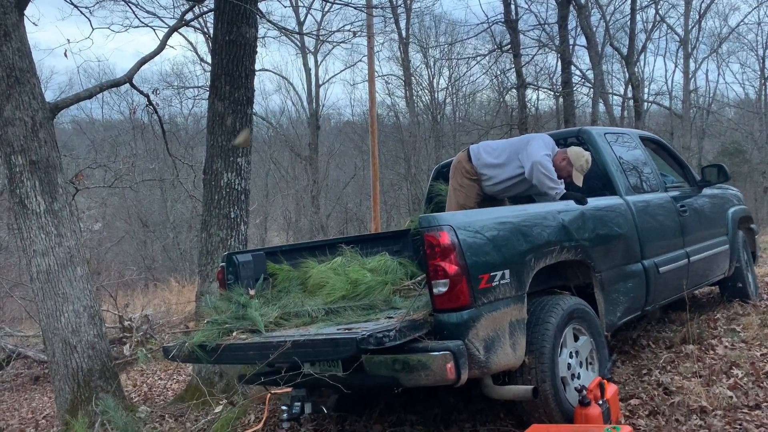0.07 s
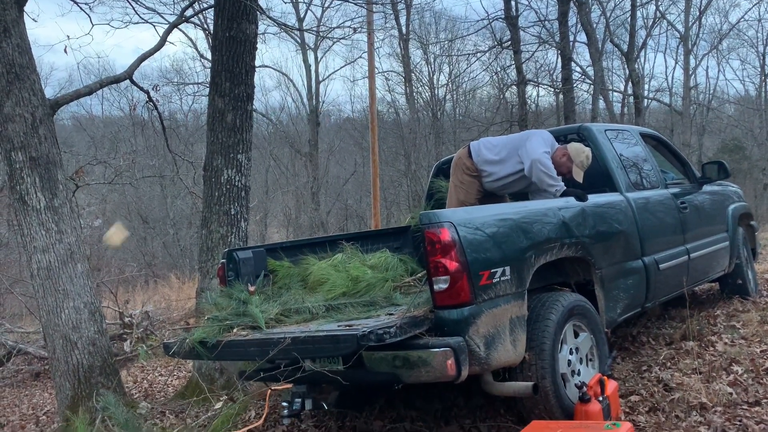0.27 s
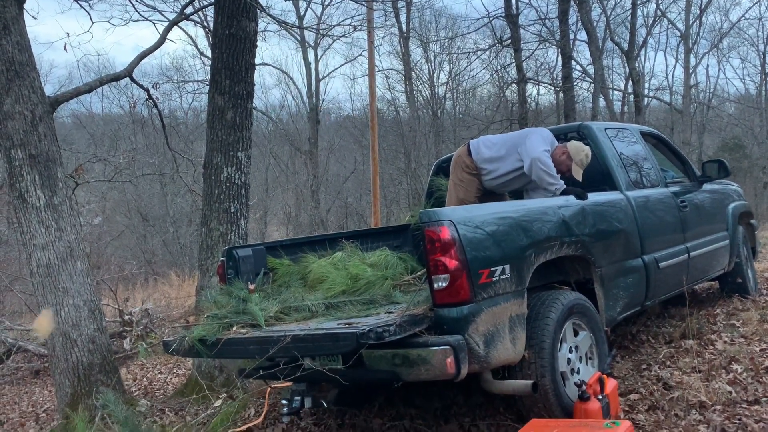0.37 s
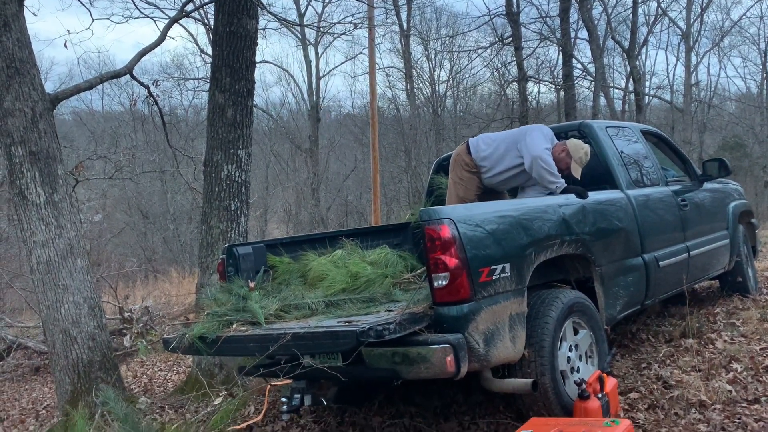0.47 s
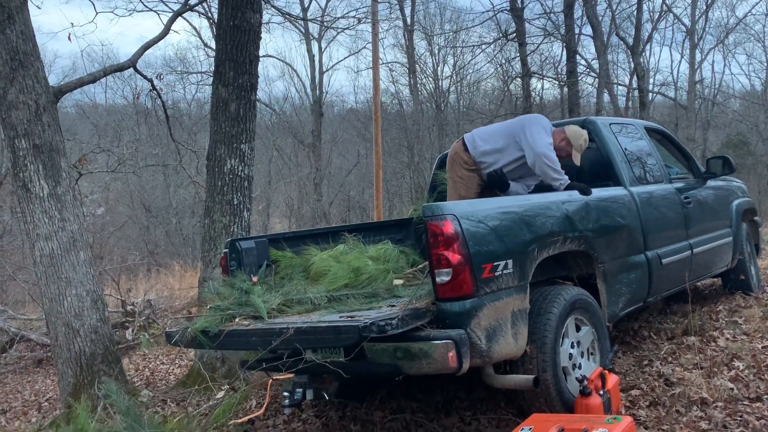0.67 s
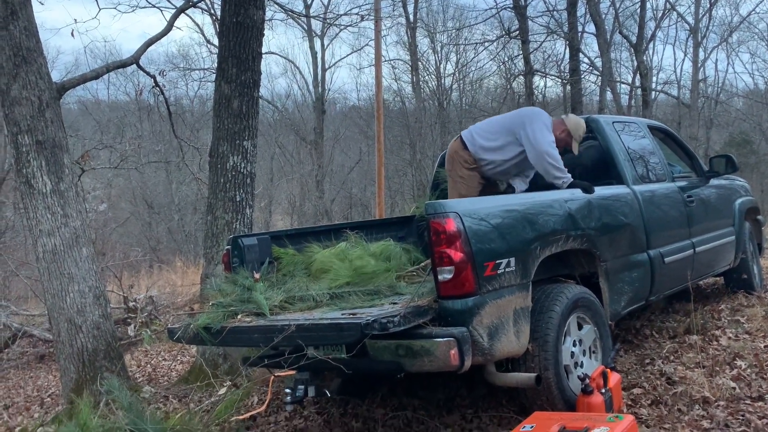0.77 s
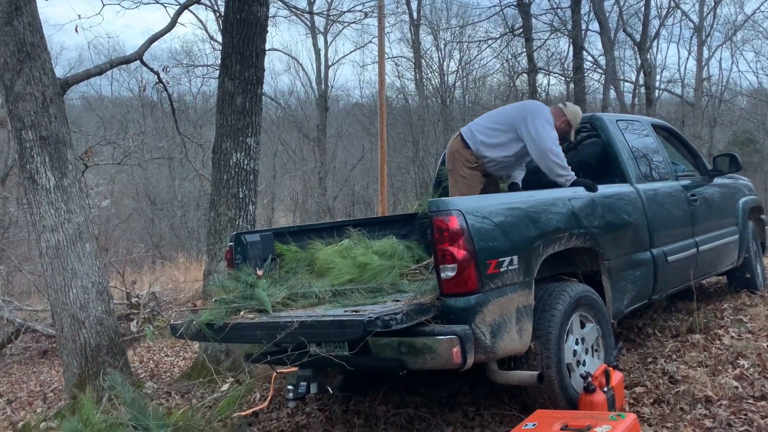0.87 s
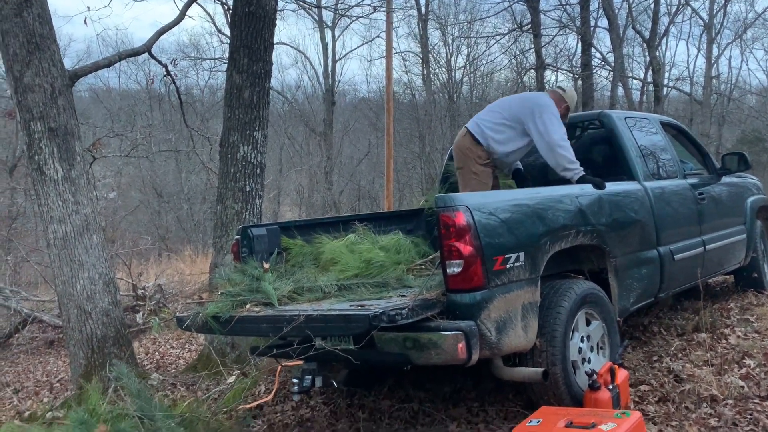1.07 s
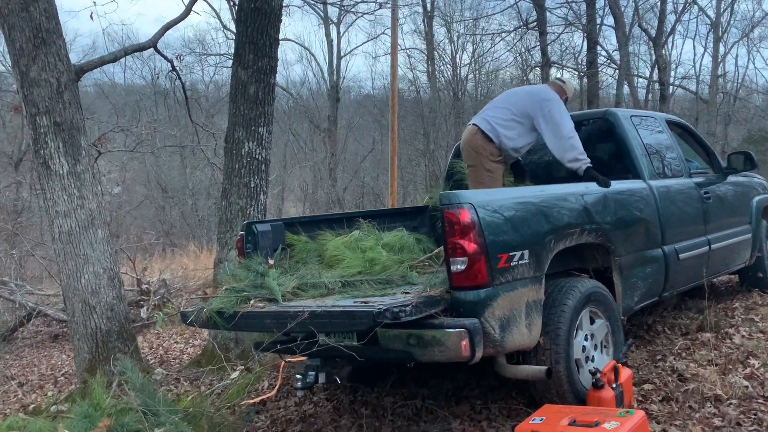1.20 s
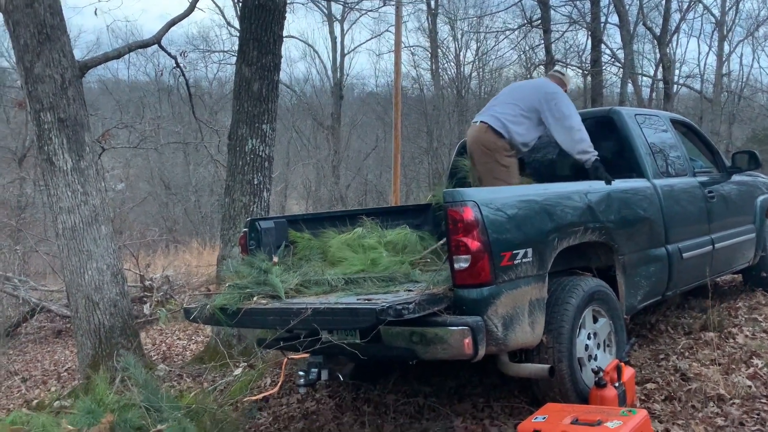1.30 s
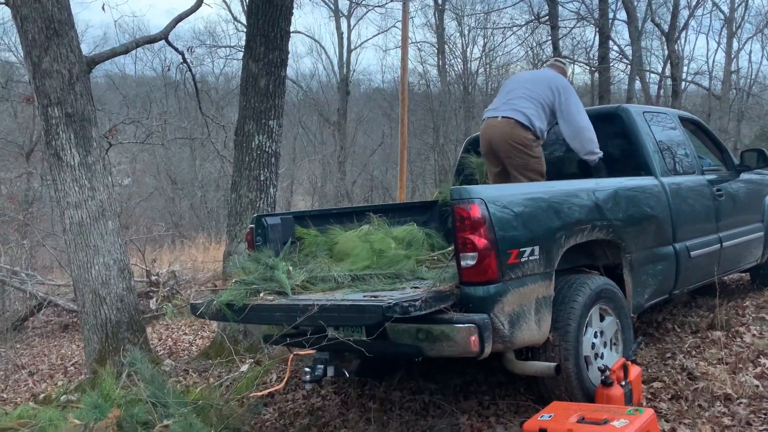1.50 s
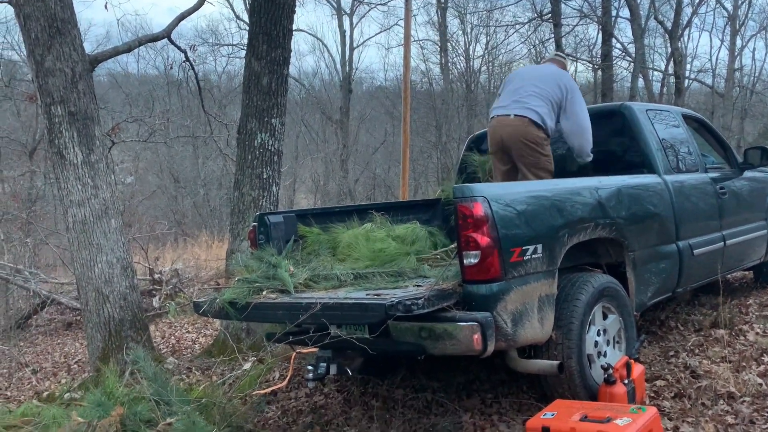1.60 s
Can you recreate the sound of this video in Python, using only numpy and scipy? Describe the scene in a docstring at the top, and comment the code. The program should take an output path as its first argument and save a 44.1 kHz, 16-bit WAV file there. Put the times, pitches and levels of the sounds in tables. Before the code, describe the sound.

Knocks and scraping come from someone shifting a load in a pickup bed a few metres away. From about 0.2 seconds it drags in jerks, with booming knocks loudest near 0.4, 0.5 and 0.8 seconds. Twigs tick and pine boughs swish around 0.7, then clothing rustles and squeaks faintly. Soft, low thumps follow from 1.0 to 1.3, and a light knock near 1.6, over faint woodland air.

```python
"""Shifting about in a pickup bed

Quiet woods, a close pair of microphones a few metres from the truck. Someone moves in the bed: a load
sticks and slips over the ribbed floor, soles scuff on grit, boots and load knock and the panels boom.
Pine boughs and clothing swish, cloth squeaks and twigs tick. Underneath, over faint air, the truck's
body rumbles on its springs and thumps softly."""
import sys
import numpy as np
from scipy import signal
from scipy.fft import rfft, irfft, next_fast_len
from scipy.io import wavfile
from scipy.ndimage import map_coordinates

SR = 44100
rng = np.random.default_rng(int(sys.argv[2]) if len(sys.argv) > 2 else 0)


def transcribe(u):
    """Save the signal u as a 16-bit wav file named by the first command-line argument.

    u: samples, shape (n,) or (channels, n), limited to [-1, 1]; the rate is SR.
    q: integer samples, one column per channel.
    """
    v = np.clip(np.atleast_2d(u).T, -1, 1)
    q = np.round(v * 32767).astype(np.int16)
    wavfile.write(sys.argv[1], SR, q)


N = 72765


def amp(db):
    """Decibels to gain."""
    return 10 ** (np.asarray(db) / 20)


def unit(x):
    """Scale to rms 1."""
    return x / np.sqrt(np.mean(x ** 2) + 1e-20)


def along(points, hz):
    """Read (f/Hz, value) points on a log frequency axis."""
    f, values = np.transpose(points)
    return np.interp(np.log(hz + 1), np.log(f + 1), values)


def level(points):
    """Gain per sample from (t/s, level/dB) points."""
    return amp(np.interp(np.arange(N) / SR, *np.transpose(points)))


def since(s):
    """Seconds since s, zero before."""
    return np.maximum(np.arange(N) / SR - s, 0)


def filtered(x, response):
    """Pass x through a complex frequency response."""
    size = next_fast_len(N + SR // 4)
    return irfft(rfft(x, size) * response(np.fft.rfftfreq(size, 1 / SR)), size)[..., :N]


def noise():
    """Two white noises."""
    return rng.standard_normal((2, N))


def grains(per_s=7000, scatter_db=0.5):
    """Friction as tiny impulses at random moments, of scattered size."""
    return noise() * (rng.random(N) < per_s / SR) * amp(scatter_db * rng.standard_normal(N))


def wobble(per_s):
    """A smooth random curve through per_s knots a second."""
    return map_coordinates(rng.standard_normal(N // 8), [np.arange(N) * per_s / SR], order=2)


def resonances(bands, hz):
    """Summed response of (f/Hz, width/Hz, level/dB) resonances."""
    return sum(amp(db) * 1j * hz * width / (centre ** 2 - hz ** 2 + 1j * hz * width)
               for centre, width, db in bands)


def ring(modes, t, scatter_db):
    """Damped (f/Hz, level/dB, t60/s) modes, their levels scattered at each strike."""
    return sum(amp(db + scatter_db * rng.standard_normal() - 60 * t / t60) * np.sin(2 * np.pi * hz * t)
               for hz, db, t60 in modes)


# Likeness at the two microphones, for sounds in the bed and for wide ones: f/Hz, coherence
BED_COHERENCE = [(200, 0.96), (1000, 0.84), (2000, 0.7), (3000, 0.17), (4200, 0.35), (6500, 0.32)]
WIDE_COHERENCE = [(40, 0.72), (300, 0.91), (1000, 0.087), (2000, 0.39), (4200, 0.38), (6500, 0.47)]
MONO_ABOVE_HZ = 7400

def stereo(pair, spectrum, coherence):
    """Two unrelated signals as a coloured, partly alike left and right of rms 1."""
    def mid_and_side(hz):
        spread = np.arccos(np.clip(along(coherence, hz), -1, 1)) / 2 * (hz < MONO_ABOVE_HZ)
        return amp(along(spectrum, hz)) * [np.cos(spread), np.sin(spread)]
    mid, side = filtered(pair, mid_and_side)
    return unit(np.array([mid + side, mid - side]))


# Colour of the quiet woods: f/Hz, level/dB
AIR_SPECTRUM = [(40, -4.5), (120, -0.5), (320, -2), (600, -16.5), (1000, -20.5), (1700, -29), (3300, -27),
                (6500, -31), (10000, -34.5), (15000, -39)]

def woodland_air():
    """Faint, steady air all around the microphones."""
    return amp(-59) * stereo(noise(), AIR_SPECTRUM, WIDE_COHERENCE)


# The body rocking on its springs: t/s, level/dB
ROCKING = [(0, -65), (.25, -52), (.5, -51), (.75, -53), (.95, -51.5), (1.06, -52.5), (1.13, -49.5),
           (1.28, -51), (1.39, -49), (1.5, -65.5), (1.65, -46)]
# Colour of its rumble: f/Hz, level/dB
RUMBLE_SPECTRUM = [(20, -40), (40, -16), (60, -0.5), (90, -3), (140, -10), (250, -30.5), (600, -83)]
# Soft thumps of the body: t/s, level/dB, starting f/Hz
BODY_THUMPS = [(1.045, -36, 81), (1.147, -27.5, 227), (1.266, -35, 73.5), (1.576, -42.5, 285)]
THUMP_END_HZ, THUMP_SAG_S, THUMP_RISE_S, THUMP_T60_S = 57.7, 0.0125, 0.0036, 0.14

def truck_body():
    """The truck rumbles as the weight shifts and gives soft thumps that sag in pitch."""
    out = level(ROCKING) * stereo(noise(), RUMBLE_SPECTRUM, WIDE_COHERENCE)
    for s, db, start_hz in BODY_THUMPS:
        t = since(s)
        hz = THUMP_END_HZ + (start_hz - THUMP_END_HZ) * np.exp(-t / THUMP_SAG_S)
        envelope = amp(db - 60 * t / THUMP_T60_S) * (1 - np.exp(-t / THUMP_RISE_S))
        out -= envelope * np.sin(2 * np.pi * np.cumsum(hz * (t > 0)) / SR)
    return out


# Ticks of twigs: t/s, level/dB, centre f/Hz
TWIG_TICKS = [(0.5598, -42.5, 4400), (0.596, -45.5, 9300), (0.6257, -41.5, 3150), (0.6946, -34, 3700),
              (1.317, -53, 6960)]
TICK_T60_S = 0.024

def twigs():
    """Twigs tick, each a short, dry burst of noise."""
    out = np.zeros((2, N))
    for s, db, hz in TWIG_TICKS:
        t = since(s)
        spectrum = [(hz / 4, -18), (hz, 0), (hz * 2, -14), (hz * 4, -30)]
        out += (t > 0) * amp(db - 60 * t / TICK_T60_S) * stereo(noise(), spectrum, BED_COHERENCE)
    return out


# The thin squeak of rubbed cloth: t/s, level/dB
SQUEAK_LEVEL = [(.81, -80), (.832, -54), (.865, -52.5), (.93, -63), (1.0, -63), (1.052, -59), (1.075, -84)]
# Its resonances, applied twice over: f/Hz, width/Hz, level/dB per pass
CLOTH_BANDS = [(4310, 700, 15.5), (6450, 470, 4)]
FLUTTER_DB = 5.5

def cloth_squeak():
    """Cloth sliding on cloth flutters in two narrow bands."""
    slips = noise()[0] * amp(FLUTTER_DB * wobble(per_s=140))
    return level(SQUEAK_LEVEL) * unit(filtered(slips, lambda hz: resonances(CLOTH_BANDS, hz) ** 2))


# Boughs and clothing rustling: t/s, level/dB
RUSTLE_LEVEL = [(.15, -80), (.32, -67), (.372, -49.5), (.42, -54.5), (.48, -75), (.594, -63), (.612, -51.5),
                (.648, -51.5), (.735, -56.5), (.82, -57), (.88, -51.5), (.935, -47.5), (1.052, -56),
                (1.066, -69.5), (1.16, -81), (1.23, -71.5), (1.28, -66), (1.37, -77.5), (1.45, -68),
                (1.53, -70.5), (1.572, -59), (1.63, -87)]
# Colours of the rustle and of the swish: f/Hz, level/dB
RUSTLE_SPECTRUM = [(500, -5), (1200, -2.5), (2300, 0), (3300, 3.5), (4300, 5.5), (5300, 0), (6400, 3),
                   (7300, -1), (10000, 0.5), (13000, -3), (15500, -4.5)]
SWISH_SPECTRUM = [(600, -4.5), (1200, -7), (2200, -4.5), (3600, 1), (5500, -6), (8000, -2), (10500, -1),
                  (13000, -3), (15500, -10.5)]
# Narrow rings added to both: f/Hz, width/Hz, level/dB
BRUSH_RINGS = [(6490, 40, 2), (10050, 40, -2), (10390, 110, 0), (10780, 60, -3)]
# Lead at the left microphone: f/Hz, phase/rad
LEFT_LEAD = [(400, 0), (1000, .5), (2000, 3), (3000, 4.9), (4200, 6.283)]
SWISH_START_S, SWISH_RISE_S, SWISH_LENGTH_S, SWISH_RELEASE_S = 0.653, 0.0074, 0.058, 0.018
SWISH_DB, SWISH_FADE_DB_PER_S, CLUMP_DB = -35, 187, 2

def brushing():
    """Needles and cloth rub in clumps of fine grains, off to one side, with one quick swish."""
    def rings_and_direction(hz):
        right_lag = along(LEFT_LEAD, hz) * np.array([[0], [1]])
        return (1 + resonances(BRUSH_RINGS, hz)) * np.exp(-1j * right_lag)
    rustle = level(RUSTLE_LEVEL) * stereo(grains(), RUSTLE_SPECTRUM, WIDE_COHERENCE)
    t = since(SWISH_START_S)
    stroke = np.minimum(t / SWISH_RISE_S, 1) * amp(SWISH_DB - SWISH_FADE_DB_PER_S * t)
    release = np.exp(-since(SWISH_START_S + SWISH_LENGTH_S) / SWISH_RELEASE_S)
    swish = stroke * release * stereo(grains() + amp(-14.5) * noise(), SWISH_SPECTRUM, WIDE_COHERENCE)
    clumps = amp(CLUMP_DB * wobble(per_s=200))
    return filtered((rustle + swish) * clumps, rings_and_direction)


# Strokes of a sole: middle t/s, level/dB, half length/s
SOLE_STROKES = [(0.37, -44.5, 0.013), (1.446, -61.5, 0.013), (1.478, -69, 0.013), (1.567, -52.5, 0.018)]
# Colour of grit underfoot: f/Hz, level/dB
GRIT_SPECTRUM = [(300, -6), (1000, 0), (1600, 1.5), (2700, -3), (3400, -2), (4500, -13.5), (7000, -13),
                 (12000, -34)]

def sole_scuffs():
    """A sole slides over grit; each stroke swells and fades."""
    t = since(0)
    strokes = sum(amp(db) * np.exp(-((t - s) / half) ** 2 / 2) for s, db, half in SOLE_STROKES)
    return strokes * stereo(grains(), GRIT_SPECTRUM, BED_COHERENCE)


# The load dragged along the bed: t/s, level/dB
DRAG_LEVEL = [(.13, -81.5), (.19, -50.5), (.228, -41), (.262, -37), (.305, -37.5), (.33, -41), (.35, -50),
              (.375, -38), (.445, -39), (.49, -54.5), (.575, -40.5), (.62, -48.5), (.7, -49), (.76, -55.5),
              (.87, -52), (1.1, -65), (1.4, -65), (1.46, -61.5), (1.53, -61), (1.575, -46.5), (1.65, -66)]
# Colour of its scrape: f/Hz, level/dB
SCRAPE_SPECTRUM = [(65, -25), (110, -7), (145, -8.5), (190, 2), (310, 0.5), (410, 0), (650, -13),
                   (850, -11), (1200, -9.5), (1560, -21.5), (2250, -18.5), (2700, -27.5), (3500, -25.5),
                   (4500, -41), (7000, -42), (10000, -75)]
JERK_DB = 2.5

def load_scrape():
    """The load sticks and slips over the floor in quick, uneven jerks."""
    slips = grains(per_s=1400, scatter_db=1.5) + amp(-18.5) * noise()
    scrape = stereo(slips, SCRAPE_SPECTRUM, BED_COHERENCE)
    jerks = amp(JERK_DB * wobble(per_s=90))
    return level(DRAG_LEVEL) * jerks * scrape


# Modes of the load's hard edge meeting the floor: f/Hz, level/dB, t60/s
EDGE_MODES = [(3160, -1.8, 0.011), (3954, -1.9, 0.015)]
SNAP_S, SNAP_DB = 0.71, -31.5

def edge_snap():
    """A hard edge of the load lands, short and bright."""
    return amp(SNAP_DB) * ring(EDGE_MODES, since(SNAP_S), scatter_db=6)


# Colour of the struck bed: f/Hz, level/dB
BED_SPECTRUM = [(100, -7.5), (180, -8.5), (380, 4.5), (620, -6), (1050, 3.5), (1520, -9.5), (1950, -3.5),
                (2700, -9.5), (4000, -12.5), (5500, -17), (12000, -24)]
# Decay of its ringing: f/Hz, t60/s
BED_DECAY = [(200, 0.52), (450, 0.24), (1000, 0.13), (2500, .1), (8000, 0.17)]

def bed_tail():
    """The whole bed rings in dense modes; the bass lasts longest."""
    hz, t, bands = signal.stft(stereo(noise(), BED_SPECTRUM, BED_COHERENCE), SR, nperseg=256)
    decay = amp(-60 * t / along(BED_DECAY, hz)[:, None])
    return signal.istft(bands * decay, SR, nperseg=256)[1][:, :N]


# Blows of boots and load: t/s, crack level/dB, floor level/dB, boom level/dB, low-pass f/Hz, boom f/Hz
BLOWS = [(0.167, -62, -56, -43, 1510, 199), (.206, -42, -48, -41.5, 1390, 233),
         (.241, -27, -40.5, -48, 2300, 330), (.251, -31, -36.5, -48, 1880, 400),
         (.3125, -24.5, -35, -46, 1690, 420), (.318, -30, -38.5, -27.5, 1446, 262),
         (.368, -26, -35, -36, 2400, 290), (.383, -42, -56, -27, 980, 303),
         (.418, -18, -32.5, -21.5, 800, 466), (.429, -18.5, -29, -20.5, 603, 424),
         (0.507, -12.5, -25, -44, 2600, 405), (0.5208, -27, -38, -23, 1100, 386),
         (.526, -38, -50, -26.5, 1078, 167), (0.657, -37, -49, -37, 984, 302),
         (.785, -19.5, -37, -37, 2870, 425), (.794, -12, -30.5, -28.5, 2040, 423),
         (.801, -37, -37.5, -24, 810, 356), (1.471, -66, -66, -51.5, 1200, 300),
         (1.564, -56, -50, -38.5, 2520, 220)]
# Modes of the first contact, the floor and the booming panels: f/Hz, level/dB, t60/s
CONTACT_MODES = [(1097, -2, 0.0079), (2000, -7.5, 0.0036), (3720, -6.5, 0.0031)]
RIBBED_FLOOR_MODES = [(685, -7, 0.048), (914, -12, 0.074), (1104, 4, 0.031), (1255, -17, 0.096),
                      (1749, -7.5, 0.059), (2030, -26, 0.079), (2353, -11.5, 0.094), (3327, -3, 0.023)]
PANEL_MODES = [(179.9, -5, 0.21), (213.3, -10, 0.23), (277, -10.5, 0.057), (324.4, -4, .2),
               (359, -2, 0.073), (414, -3, 0.11), (508.3, -9.5, 0.18)]
CRACK_T60_S, BOOM_RISE_S, BED_LOW_CUT_HZ = 0.019, 0.00083, 120
BOOM_FOCUS_DB = 11  # loss one octave from the boom's centre

def knocks():
    """Each blow cracks, rings the floor and sets the panels under it booming; soft contacts are dull."""
    out, t = np.zeros((2, N)), since(0)
    for s, crack_db, floor_db, boom_db, cutoff_hz, boom_hz in BLOWS:
        burst = amp(-11 - 60 * t / CRACK_T60_S) * stereo(noise(), BED_SPECTRUM, BED_COHERENCE)
        crack = amp(crack_db) * (burst - ring(CONTACT_MODES, t, scatter_db=0))
        floor = amp(floor_db) * (ring(RIBBED_FLOOR_MODES, t, scatter_db=2.5) + amp(0.5) * bed_tail())
        clack = signal.lfilter(*signal.butter(2, cutoff_hz, fs=SR), crack + floor)
        # Where the blow lands picks the modes that boom.
        panels = [(hz, db - BOOM_FOCUS_DB * np.log2(hz / boom_hz) ** 2, t60)
                  for hz, db, t60 in PANEL_MODES]
        boom = amp(boom_db) * ring(panels, t, scatter_db=1.5) * (1 - np.exp(-t / BOOM_RISE_S))
        start = round(s * SR)
        out[:, start:] += (clack + boom)[:, :N - start]
    return signal.lfilter(*signal.butter(3, BED_LOW_CUT_HZ, "high", fs=SR), out)


def scene():
    """The truck from a few metres off, over the faint air of the woods."""
    in_the_bed = knocks() + edge_snap() + load_scrape() + sole_scuffs()
    return in_the_bed + brushing() + cloth_squeak() + twigs() + truck_body() + woodland_air()


# Mismatch of the microphone pair: f/Hz, left minus right level/dB
MIC_BALANCE = [(80, 1), (260, -1.5), (1000, 1), (2200, 1.8), (4000, 1.3), (6000, -1.5)]
LAG_ABOVE_HZ, LAG_HZ_PER_CYCLE, BAND_LIMIT_HZ = 6200, 4800, 15780

def record(dry):
    """A close, band-limited pair, slightly unequal in level; the left lags in the high treble."""
    def microphones(hz):
        balance = amp(along(MIC_BALANCE, hz) * (hz < MONO_ABOVE_HZ) * np.array([[0.5], [-0.5]]))
        lag_cycles = np.maximum(hz - LAG_ABOVE_HZ, 0) / LAG_HZ_PER_CYCLE * np.array([[1], [0]])
        return balance * np.exp(-2j * np.pi * lag_cycles) * (hz < BAND_LIMIT_HZ)
    return filtered(dry, microphones)


dry = scene()
out = record(dry)
transcribe(out)
```